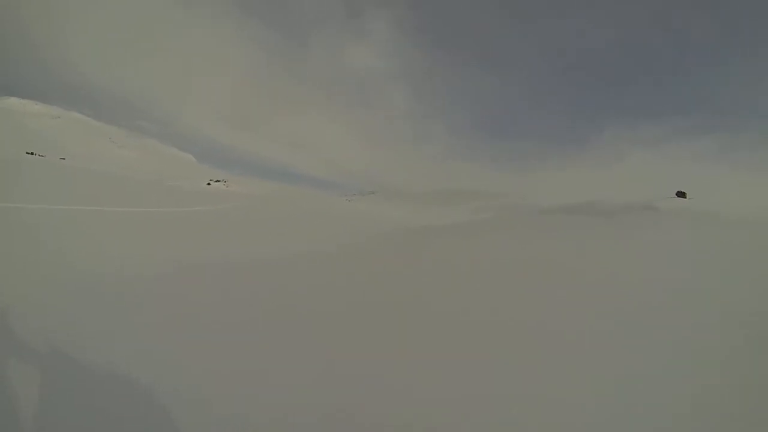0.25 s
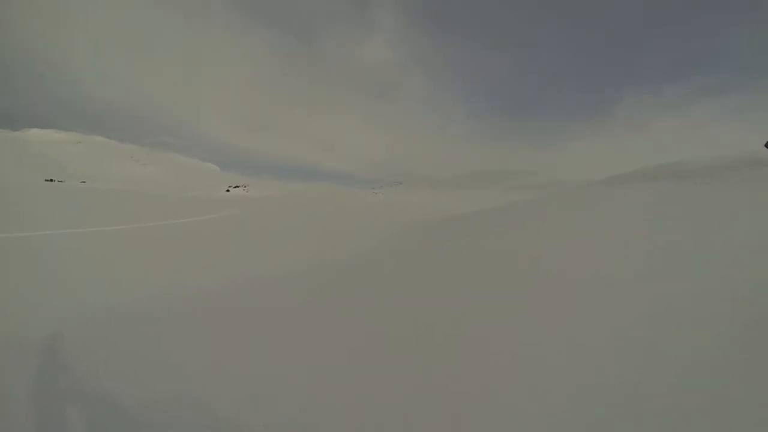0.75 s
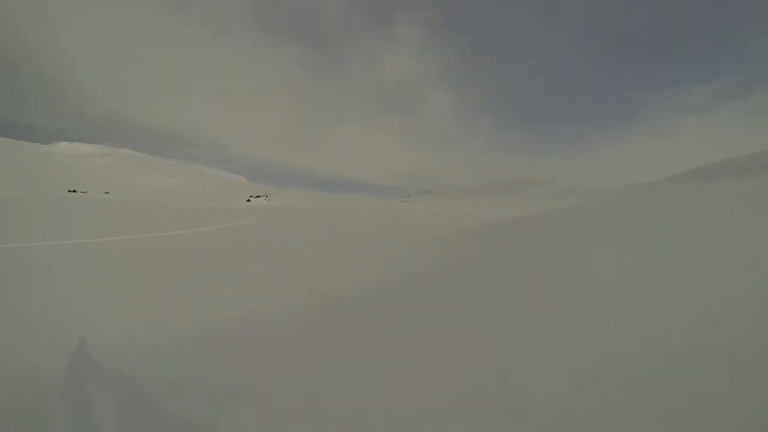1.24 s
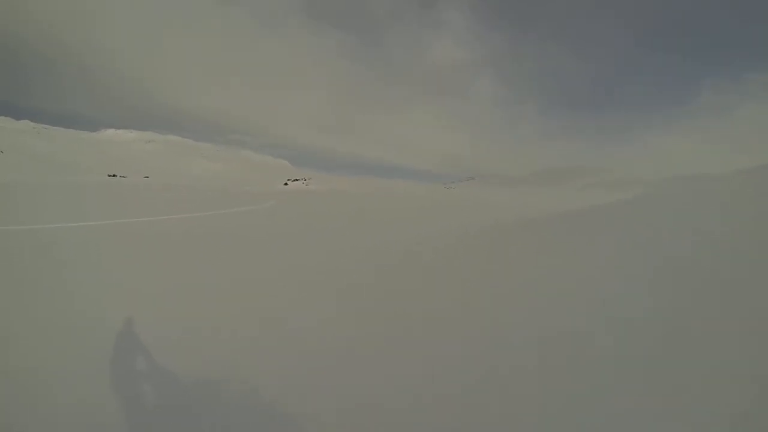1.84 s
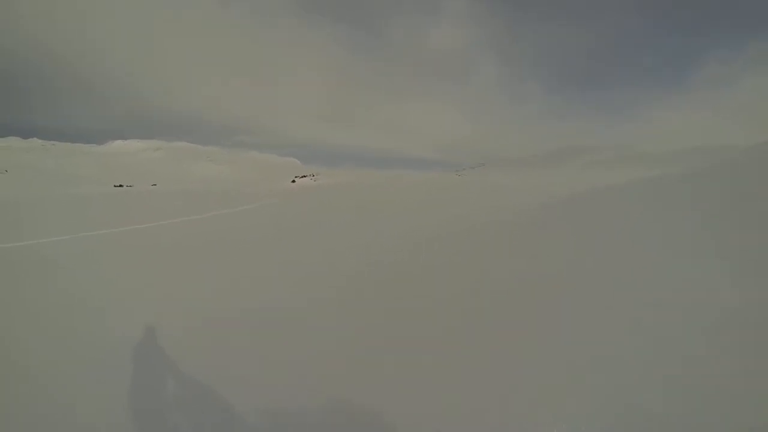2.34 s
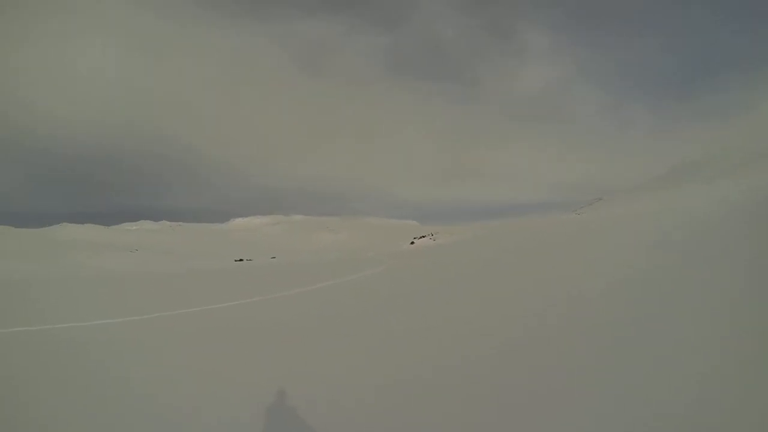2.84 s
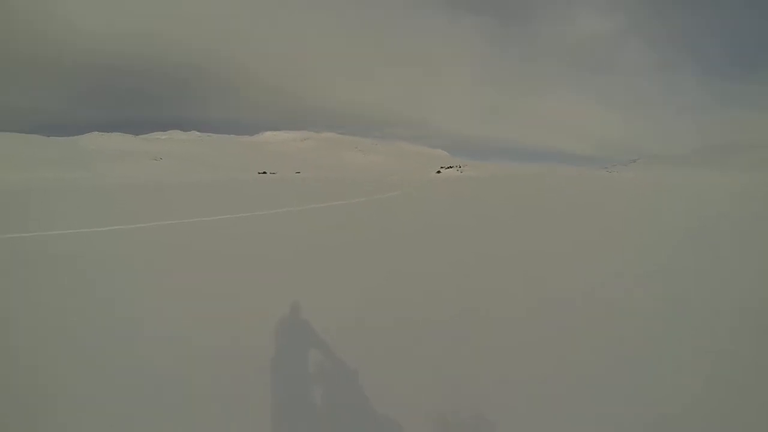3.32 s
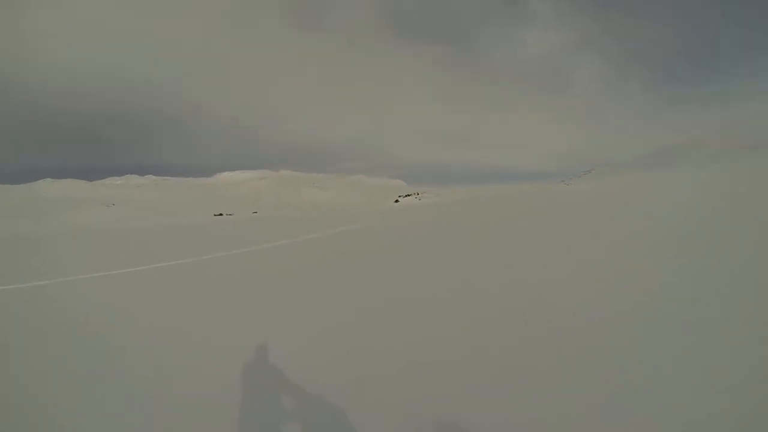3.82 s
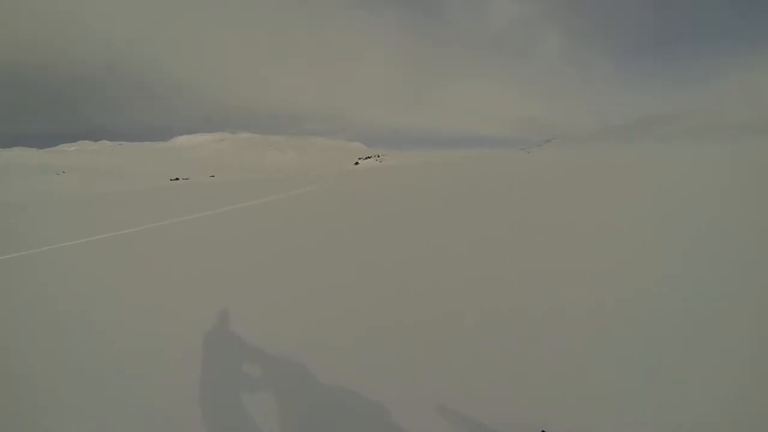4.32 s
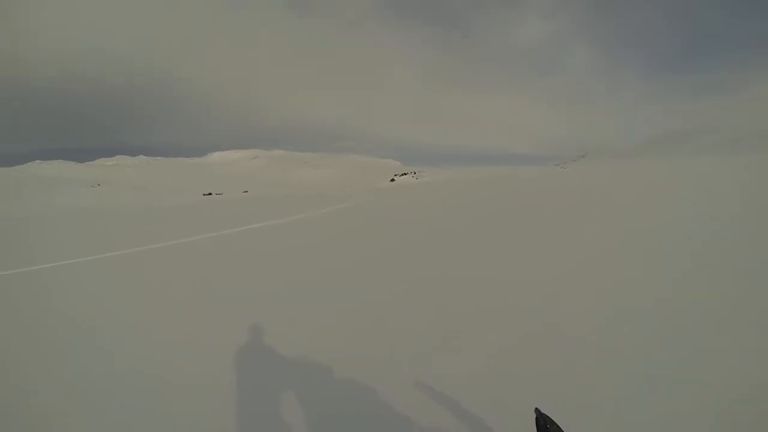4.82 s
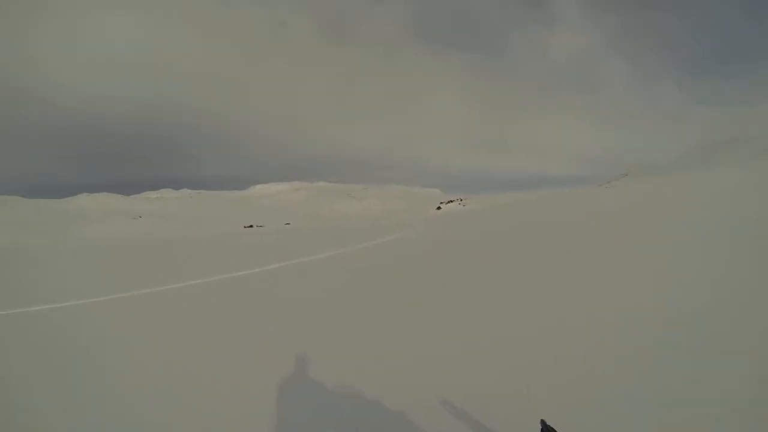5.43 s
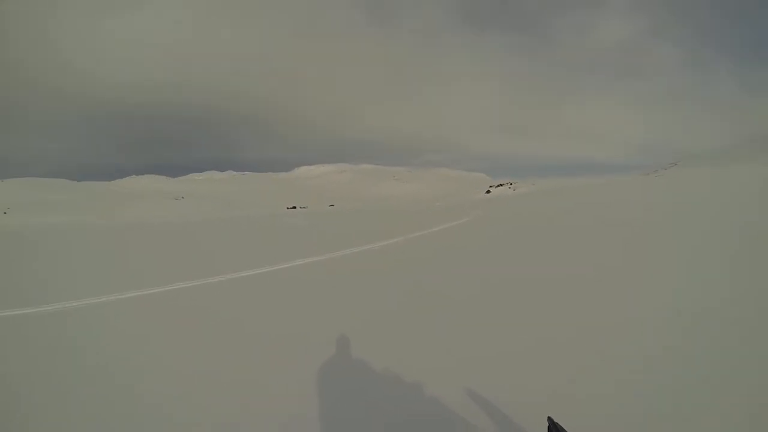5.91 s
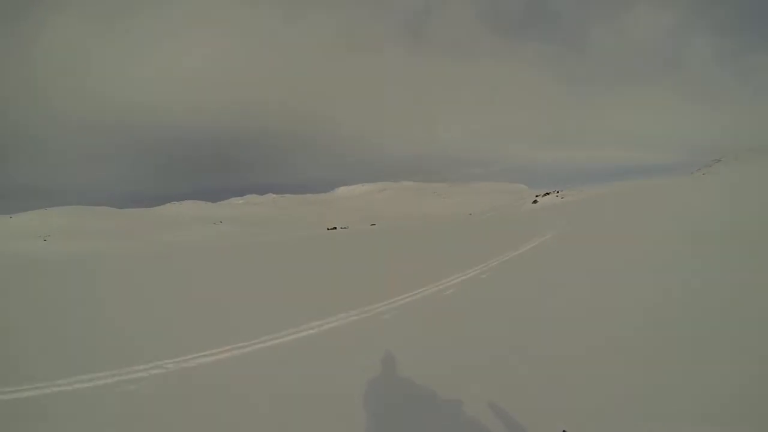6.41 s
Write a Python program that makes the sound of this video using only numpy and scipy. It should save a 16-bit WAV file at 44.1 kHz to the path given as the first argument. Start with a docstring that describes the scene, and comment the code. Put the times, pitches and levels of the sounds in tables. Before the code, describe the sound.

A snowmobile engine drops off with a turbo gasp and squeal, coasts, then revs back up in surges with a steady high whine.

```python
"""Out on open snow, at the rider's camera on a turbocharged three-cylinder snowmobile.
The throttle shuts, the blow-off valve gasps and squeals, and the turbo whistles as it spins down.
The engine coasts, then pulls up again in surges, its exhaust note built on the firing rate.
Engine clatter rings the camera housing in a steady whine; track rumble, churned snow,
wind buffeting and chassis thuds run underneath."""
import sys
import numpy as np
from scipy import signal
from scipy.fft import rfft, irfft
from scipy.io import wavfile
from scipy.ndimage import uniform_filter1d, map_coordinates

SR = 44100
rng = np.random.default_rng(int(sys.argv[2]) if len(sys.argv) > 2 else 0)


def transcribe(u):
    """Save the signal u as a 16-bit wav file named by the first command-line argument.

    u: samples, shape (n,) or (channels, n), limited to [-1, 1]; the rate is SR.
    q: integer samples, one column per channel.
    """
    v = np.clip(np.atleast_2d(u).T, -1, 1)
    q = np.round(v * 32767).astype(np.int16)
    wavfile.write(sys.argv[1], SR, q)


N = 293706
TIME = np.arange(N) / SR
BINS_HZ = np.fft.rfftfreq(N, 1 / SR)
COASTING_HZ, CYLINDERS = 100, 3

# the slow rev curve: (t/s, firing rate/Hz)
REV_CURVE = [(0, 210), (.05, 204), (.14, 169), (.3, 118), (.38, 106.5), (.56, 118), (1.02, 125.7),
             (1.18, 123), (1.38, 105), (1.7, 99.3), (2.2, 98), (2.6, 94.6), (2.85, 95.3), (3.25, 92.5),
             (3.55, 98.5), (4.02, 103), (5.4, 152), (6.1, 155.7), (6.45, 175.5), (6.66, 178)]
# the engine races ahead and falls back: (t/s, half width/s, added firing rate/Hz)
SURGES = [(4.315, .155, 24.5), (4.725, .09, 9.5), (5.165, .125, 19)]

def firing_hz():
    """Engine speed in firings a second: the rev curve with the surges on top."""
    return curves(REV_CURVE)[0] + humps(SURGES)


# the exhaust pipe's EQ: (f/Hz, gain/dB)
PIPE_EQ = [(100, 1.5), (200, 1.5), (285, 1.5), (365, -4), (410, 1.5), (485, -8.5), (540, -1), (620, 2),
           (820, -1.5)]

def pipe_db(order):
    """The pipe lifts and dips a firing order as the revs slide it through the resonances."""
    return np.interp(order * firing_hz(), *np.transpose(PIPE_EQ))


# firing orders 1-4: (level/dB coasting with throttle shut, full-throttle gain/dB, gain/dB per rev doubling)
FIRING_ORDERS = [(-38, -2, 5), (-51.5, 21.5, 2.5), (-49, 13, -0.5), (-57, 4.5, 14)]
# the rider's throttle: (t/s, opening 0-1)
THROTTLE = [(0, 0.72), (.15, 0.67), (.33, .3), (.45, 0.52), (1.17, 0.67), (1.33, 0), (1.52, 0), (1.75, .35),
            (3, 0.53), (3.8, 0.64), (4.25, 0.91), (4.55, 0.69), (5.15, 0.73), (5.4, 0.71), (6.66, 0.86)]
# the lowest note booms: (t/s, half width/s, gain/dB)
BOOMS = [(.3, 0.18, 11.5), (1.26, 0.27, 7.5), (2.66, 0.26, 11), (3.32, 0.078, 4), (4.06, 0.23, 13),
         (4.52, 0.12, 6), (5.02, 0.19, 6), (6.12, 0.24, 7)]

def order_levels():
    """Level in dB of each firing order: it follows throttle and revs, coloured by the pipe."""
    throttle = curves(THROTTLE)[0]
    doublings = np.log2(firing_hz() / COASTING_HZ)
    levels = [db + load_db * throttle + rev_db * doublings + pipe_db(order)
              for order, (db, load_db, rev_db) in enumerate(FIRING_ORDERS, 1)]
    levels[0] += humps(BOOMS)
    return levels


# the exhaust's bite, ahead of the pipe EQ: (firing order, level/dB against order 4)
OVERTONES = [(5, -13), (6, -14), (7, -17), (8, -17)]
# lope from unequal cylinders: (multiple of the engine cycle, level/dB against order 2)
LOPE = [(2, -7), (4, -6.5), (5, -20.5), (7, -13.5), (8, -15), (10, -15.5), (11, -24.5), (13, -31.5),
        (14, -24.5)]

def exhaust(firings):
    """Clean firing orders, with weak lines at thirds because the three cylinders differ."""
    levels = order_levels()
    note = sum(gain_of(db) * partial(firings, order, flutter_db=1, flutter_hz=14, drift=.1)
               for order, db in enumerate(levels, 1))
    overtones = sum(gain_of(db + pipe_db(k)) * partial(firings, k, flutter_db=2.5, flutter_hz=14, drift=.3)
                    for k, db in OVERTONES)
    lope = sum(gain_of(db) * partial(firings, k / CYLINDERS, flutter_db=2.5, flutter_hz=8, drift=.4)
               for k, db in LOPE)
    bite = gain_of(levels[3]) + gain_of(-59)  # some edge stays even off the throttle
    return note + bite * overtones + gain_of(levels[1]) * lope


def knocks(firings, locked, throb):
    """A rattle looping each engine cycle (power share `locked`), plus noise throbbing with the engine."""
    cycles = firings / CYLINDERS
    pattern = rng.standard_normal(size=512)
    loop = map_coordinates(pattern, [cycles % 1 * len(pattern)], order=3, mode="grid-wrap")
    pulse = 1 + throb * np.cos(2 * np.pi * firings) + throb * np.cos(2 * np.pi * cycles)
    return np.sqrt(locked) * evened(loop) + np.sqrt(1 - locked) * evened(noise() * pulse)


# EQs of the housing's broad and narrow ring, the rasp and the top hiss: (f/Hz, relative level/dB)
RING_BROAD_EQ = [(1000, -19), (1150, -20), (1280, -7.5), (1400, 0.5), (1560, 3.5), (1660, 1), (1770, -4.5),
                 (1870, -23), (2000, -36)]
RING_NARROW_EQ = [(1000, -43.5), (1150, -28), (1280, -13), (1380, -8), (1470, -3), (1560, 0), (1660, 4),
                  (1740, -6), (1830, -23.5), (1950, -36.5)]
RASP_EQ = [(1850, -3.5), (2020, -0.5), (2280, 2), (2550, -7), (2900, -3.5), (3300, -3.5), (3700, -8.5),
           (4050, -12.5), (4750, -11.5), (5300, -15.5), (5700, -22)]
HISS_EQ = [(5400, -4.5), (5700, -3), (6100, 1.5), (6550, 0), (7000, -4.5), (7550, -5.5), (8200, -0.5),
           (9200, -13.5), (10000, -12), (11800, -20.5), (12900, -17.5), (13700, -26.5), (14700, -24.5)]
# the ring swells, mostly as a line sings out: (t/s, half width/s, gain/dB)
RING_SWELLS = [(.05, 0.25, 5), (4.35, 0.055, 5), (4.72, 0.18, 2), (5.02, 0.074, 2.5), (5.24, 0.068, 3.5),
               (6.01, 0.18, 4), (6.35, 0.03, 5), (6.6, 0.14, 3.5)]
# how each follows the drive: (coasting level/dB, gain/dB per rev doubling, share of the rattles)
RING_DRIVE = (-32, 18.54, 1)
RASP_DRIVE = (-47, 16.9, 1.47)
HISS_DRIVE = (-66, 23.3, 1.4)

def clatter(firings, ring_cap_db=-21, ring_shake_db=1.0, hiss_shake_db=.5):
    """Engine knocks ring the housing near 1.6 kHz, with rasp and hiss above; all shake with the ride."""
    ring_db = np.minimum(driven(RING_DRIVE), ring_cap_db) + humps(RING_SWELLS)
    knocking = knocks(firings, locked=.2, throb=.21)
    narrow = np.interp(TIME, [2.0, 4.2], [0, 1])
    ring = (1 - narrow) * coloured(knocking, RING_BROAD_EQ) + narrow * coloured(knocking, RING_NARROW_EQ)
    # a singing line takes its share of the housing's energy, so the ring ducks
    singing_power = sum(envelope ** 2 for envelope, _ in singing_envelopes())
    duck = np.sqrt(np.clip(1 - singing_power / gain_of(ring_db) ** 2, .35, 1))
    rasp = gain_of(driven(RASP_DRIVE)) * coloured(knocks(firings, locked=.14, throb=.1), RASP_EQ)
    hiss = gain_of(driven(HISS_DRIVE)) * coloured(knocks(firings, locked=0, throb=.048), HISS_EQ)
    shake = wander(rate_hz=16)
    whine = gain_of(ring_db + ring_shake_db * shake) * duck * steadied(ring, span_s=.29)
    return whine + gain_of(hiss_shake_db * shake) * (rasp + hiss)


# single lines sing out under load: (t/s, half width/s, multiple of the engine cycle, level/dB)
SINGING_LINES = [(4.35, .05, 34, -24), (4.35, .05, 35, -22.5), (5.02, .05, 35, -23), (5.86, .2, 32, -25),
                 (6.05, .13, 30, -18.5), (6.35, .04, 29, -17), (6.56, .1, 27, -27), (6.58, .13, 39, -37)]

def singing_envelopes():
    """The bell-shaped envelope of each singing line, with its multiple of the cycle."""
    return [(humps([(s, half, gain_of(db))]), k) for s, half, k, db in SINGING_LINES]


def singing(firings):
    """High engine orders swell on cue, as if crossing a resonance of the bodywork."""
    return sum(envelope * partial(firings, k / CYLINDERS, flutter_db=1.2, flutter_hz=20, drift=.2)
               for envelope, k in singing_envelopes())


# the turbo's spin-down: (t/s, shaft speed/Hz, whistle level/dB)
SPIN_DOWN = [(.05, 2150, -55), (.16, 1860, -48), (.45, 1450, -70), (1.25, 990, -54), (1.52, 870, -34),
             (1.8, 820, -45), (2.23, 767, -33), (2.58, 702, -45), (2.88, 675, -42), (3.22, 619, -44),
             (3.6, 608, -53), (3.95, 600, -80)]
# the whistle's overtones: (shaft order, level/dB)
WHISTLE_OVERTONES = [(3, -53), (4, -57.5)]
# they come through midway down: (t/s, half width/s, strength 0-1)
OVERTONE_SWELL = [(2.4, .75, 1)]
# the compressor blades sing at full boost: (t/s, level/dB)
BLADE_FADE = [(0, -45), (.05, -45), (.1, -55), (.15, -58), (.22, -80), (.3, -100)]

def turbo(blade_count=6):
    """The shaft whistles at twice its speed as it spins down; at boost its blades add a very high tone."""
    shaft_hz, whistle_db = curves(SPIN_DOWN)
    turns = np.cumsum(shaft_hz) / SR
    whistle = gain_of(whistle_db) * partial(turns, 2, flutter_db=2, flutter_hz=25, drift=.4)
    overtones = sum(gain_of(db) * partial(turns, order, flutter_db=3, flutter_hz=30, drift=.7)
                    for order, db in WHISTLE_OVERTONES)
    blades = partial(turns, blade_count, flutter_db=3, flutter_hz=150, drift=1.2)
    return whistle + humps(OVERTONE_SWELL) * overtones + gain_of(curves(BLADE_FADE)[0]) * blades


# the gasp of air dumped as the throttle shuts: (t/s, level/dB)
GASP = [(0, -41), (.1, -32), (.15, -29), (.2, -31.5), (.28, -36.5), (.36, -45), (.5, -100)]
# the valve's resonances: (f/Hz, width/Hz, relative level/dB)
VALVE_PEAKS = [(2864, 220, 6), (3800, 600, -3), (6110, 1100, -2), (8300, 950, -9.5), (10700, 1900, -19),
               (12700, 1600, -14.5)]

def blow_off(top_hz=13800):
    """Boost air rushes out through the valve's resonances."""
    peaks = sum(gain_of(db) / (1 + (2 * (BINS_HZ - hz) / width) ** 2) for hz, width, db in VALVE_PEAKS)
    high_cut = 1 / (1 + (BINS_HZ / top_hz) ** 20)
    rush = evened(irfft(rfft(noise()) * peaks * high_cut, N))
    return gain_of(curves(GASP)[0]) * rush


# the squeal's dive: (t/s, f/Hz, level/dB)
SQUEAL_DIVE = [(.09, 3800, -75), (.13, 3740, -35), (.165, 3783, -28), (.21, 3520, -36), (.25, 3280, -24),
               (.3, 3230, -44), (.38, 2980, -69), (.5, 2800, -100)]

def valve_squeal(width_hz=250):
    """The valve squeals lower as the boost bleeds away: narrow noise on a falling pitch."""
    hz, db = curves(SQUEAL_DIVE)
    phase = 2 * np.pi * np.cumsum(hz) / SR
    return gain_of(db) * (wander(width_hz) * np.cos(phase) + wander(width_hz) * np.sin(phase))


# EQs of track rumble and churned snow: (f/Hz, relative level/dB)
RUMBLE_EQ = [(70, -16.5), (95, 5), (130, 0), (200, -2.5), (320, -8.5), (450, -13), (700, -22.5),
             (1200, -51.5)]
SNOW_EQ = [(80, -17), (200, 5), (400, -5.5), (600, 0.5), (850, -3), (1100, -4.5), (1500, 9), (2500, -36)]
# how each follows the drive: (coasting level/dB, gain/dB per rev doubling, share of the rattles)
RUMBLE_DRIVE = (-41, 9.9, 0.86)
SNOW_DRIVE = (-50, 15, 1.36)

def track(lumpy_db=1.24):
    """The track rumbles over uneven snow and churns it up."""
    lumps = gain_of(lumpy_db * wander(rate_hz=28))
    rumble = gain_of(driven(RUMBLE_DRIVE)) * coloured(noise(), RUMBLE_EQ)
    snow = gain_of(driven(SNOW_DRIVE)) * coloured(noise(), SNOW_EQ)
    return lumps * (rumble + snow)


# the wind's sub-bass EQ: (f/Hz, relative level/dB)
BUFFET_EQ = [(5, -15.5), (11, -1), (16, 4), (23, -7), (32, -13), (45, -26), (70, -34)]
# gusts and a lull: (t/s, half width/s, gain/dB)
GUSTS = [(.65, .13, 15.5), (1.85, 0.09, 8.5), (2.3, 0.38, 4.5), (3.25, 0.039, 10), (5.3, .3, 6.5),
         (6.3, 0.21, -6)]

def wind(bed_db=-24):
    """Air buffets the microphone."""
    return gain_of(bed_db + humps(GUSTS)) * steadied(coloured(noise(), BUFFET_EQ), span_s=1.0)


# the chassis thud's EQ: (f/Hz, relative level/dB)
THUD_EQ = [(32, 6.5), (42, 7.5), (62, 3), (75, -2), (90, -17), (130, -27.5), (250, -37)]
# the running shake: (coasting level/dB, gain/dB per rev doubling, share of the rattles)
SHAKE_DRIVE = (-35, 15, .1)
# bumps under the skis: (t/s, level/dB before the trim)
BUMPS = [(0.314, -9.5), (0.489, -18), (1.249, -24), (1.639, -9), (1.842, -11), (2.859, -15), (3.039, -16),
         (3.139, -12.5), (3.259, -23), (4.279, -28), (4.368, -7.5), (4.751, -15), (5.029, -9.5),
         (5.508, -13), (5.854, -8), (6.061, -10), (6.269, -16), (6.4, -10.5), (6.559, -11.5)]

def chassis(shake_cap_db=-24.5, bump_trim_db=-10, rise_s=.022):
    """The chassis shakes harder with the revs, up to a ceiling, and thuds at each bump."""
    power = gain_of(np.minimum(driven(SHAKE_DRIVE), shake_cap_db)) ** 2
    for s, db in BUMPS:
        age = np.maximum(TIME - s, 0) / rise_s
        power += (gain_of(db + bump_trim_db) * age * np.exp(1 - age)) ** 2
    return np.sqrt(power) * steadied(coloured(noise(), THUD_EQ), span_s=.034)


# track and driveline rattle harder on the overrun and ease in between: (t/s, half width/s, gain/dB)
RATTLES = [(.43, 0.26, 8.5), (.68, 0.12, -5), (1.45, .48, 4), (6.66, 0.25, -0.5)]

def driven(drive):
    """Level in dB of a noise that rides the revs and the rattles."""
    db, per_doubling_db, share = drive
    return db + per_doubling_db * np.log2(firing_hz() / COASTING_HZ) + share * humps(RATTLES)


def partial(turns, order, flutter_db, flutter_hz, drift):
    """One multiple of a rotation, fluttering in level and drifting in phase (radians); rms 1."""
    phase = 2 * np.pi * (order * turns + rng.random()) + drift * wander(flutter_hz)
    return evened(np.sin(phase) * gain_of(flutter_db * wander(flutter_hz)))


def coloured(x, eq, skirt_db=90):
    """Applies an EQ that falls by skirt_db an octave past its ends; rms 1."""
    hz, db = np.transpose(eq)
    octave, points = np.log2(BINS_HZ + 1), np.log2(hz + 1)
    outside = abs(octave - np.clip(octave, points[0], points[-1]))
    response = gain_of(np.interp(octave, points, db) - skirt_db * outside)
    return evened(irfft(rfft(x) * response, N))


def steadied(x, span_s):
    """Levels out a noise's slow swells, so that its envelope leads."""
    power = uniform_filter1d(x ** 2, int(span_s * SR))
    return x / np.sqrt(uniform_filter1d(power, int(span_s * SR / 2)) + 1e-9)


def wander(rate_hz):
    """Smooth random modulation up to about rate_hz; rms 1."""
    return evened(irfft(rfft(noise()) * np.exp(-(BINS_HZ / rate_hz) ** 2), N))


def curves(rows):
    """Straight-line automation for each column after t/s."""
    s, *columns = np.transpose(rows)
    return [np.interp(TIME, s, column) for column in columns]


def humps(rows):
    """Bell-shaped swells from rows of (t/s, half width/s, height)."""
    return sum(height * np.exp(-((TIME - s) / half) ** 2) for s, half, height in rows)


def noise():
    """White noise."""
    return rng.standard_normal(N)


def evened(x):
    """Scales to rms 1."""
    return x / np.sqrt(np.mean(x ** 2) + 1e-20)


def gain_of(db):
    """Decibels to amplitude."""
    return 10 ** (np.asarray(db) / 20)


def scene():
    """A dry mono mix: everything rides with the one microphone, in open air."""
    firings = np.cumsum(firing_hz()) / SR
    engine = exhaust(firings) + clatter(firings) + singing(firings)
    return (engine + turbo() + blow_off() + valve_squeal() + track() + wind() + chassis())[None]


def record(dry, hiss_db=-73.5, high_cut_hz=14900):
    """The recorder's faint hiss and its band limit."""
    sound = dry + gain_of(hiss_db) * noise()
    high_cut = signal.firwin(511, high_cut_hz, window=("kaiser", 9), fs=SR)
    return signal.oaconvolve(sound, high_cut[None], "same")


dry = scene()
out = record(dry)
transcribe(out)
```